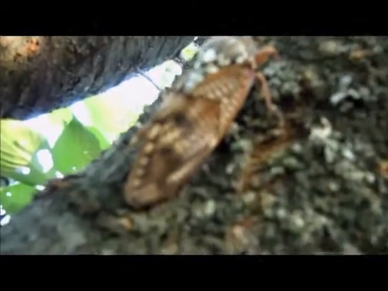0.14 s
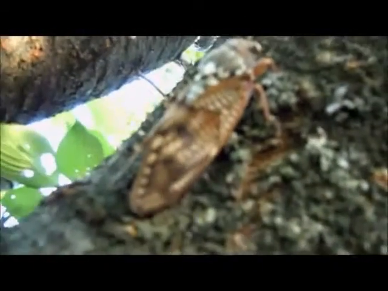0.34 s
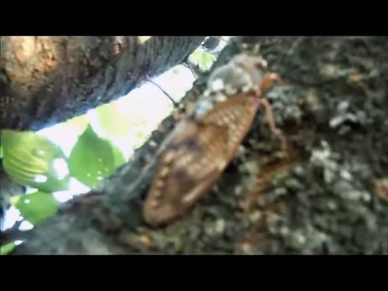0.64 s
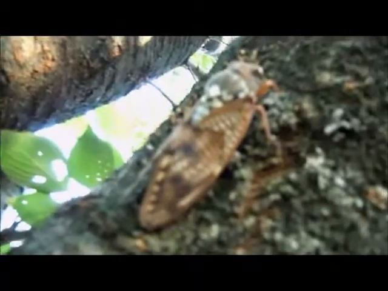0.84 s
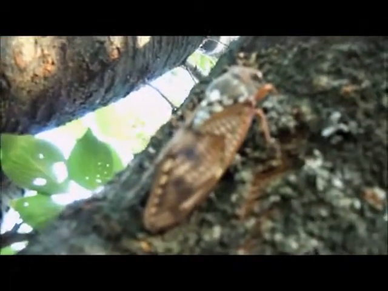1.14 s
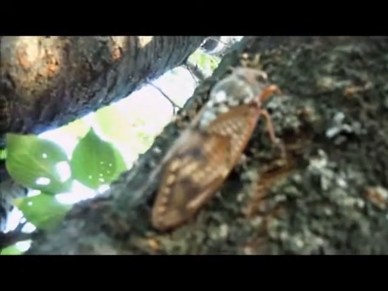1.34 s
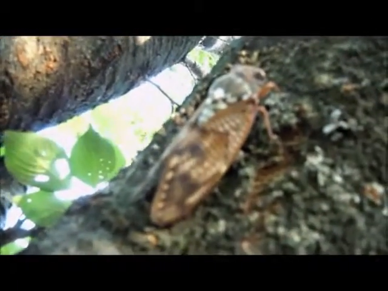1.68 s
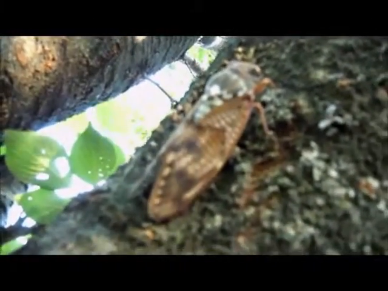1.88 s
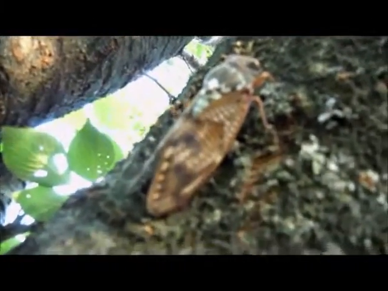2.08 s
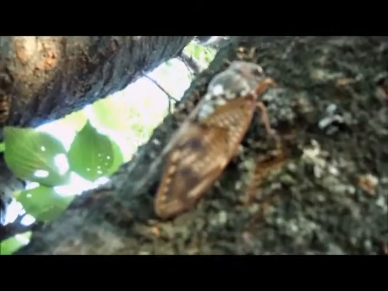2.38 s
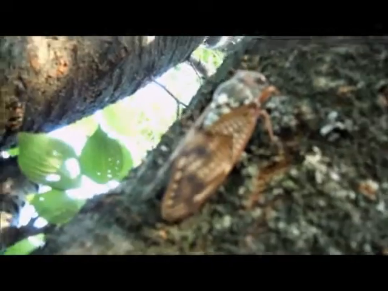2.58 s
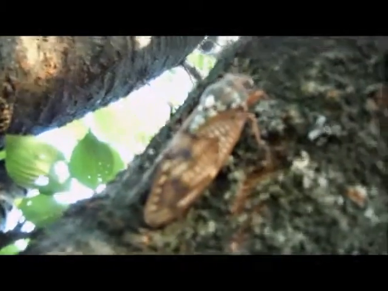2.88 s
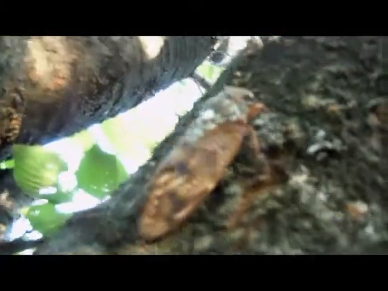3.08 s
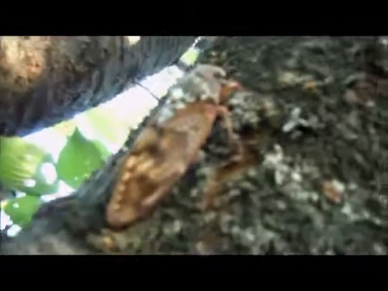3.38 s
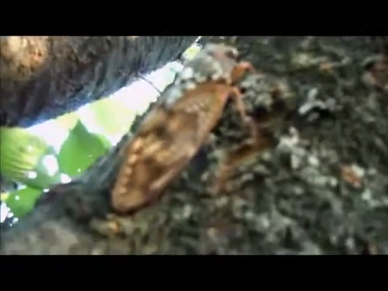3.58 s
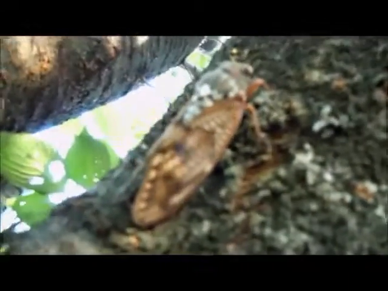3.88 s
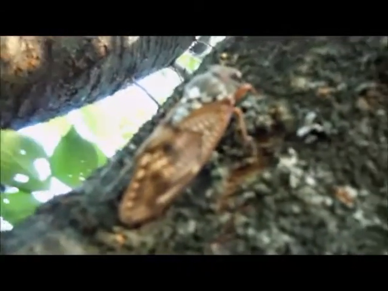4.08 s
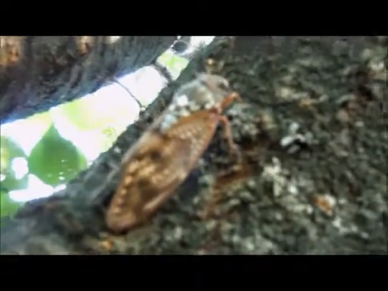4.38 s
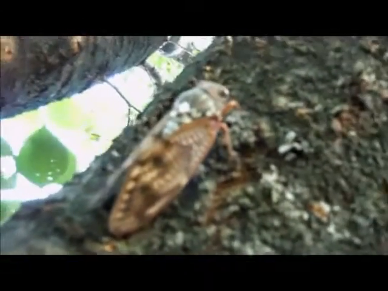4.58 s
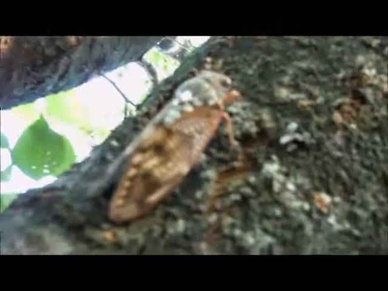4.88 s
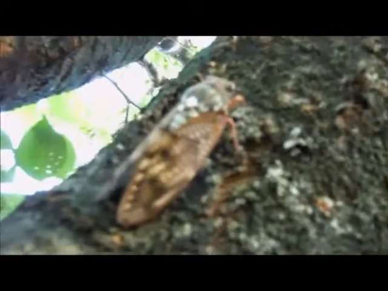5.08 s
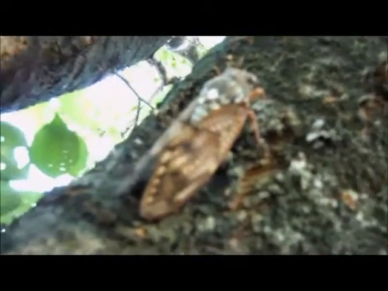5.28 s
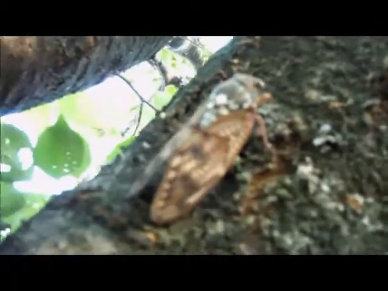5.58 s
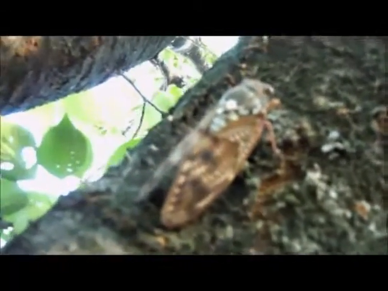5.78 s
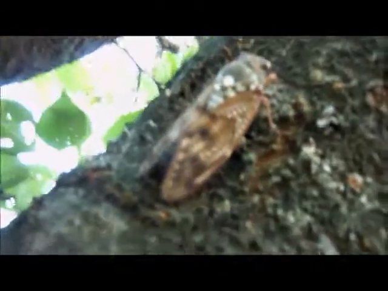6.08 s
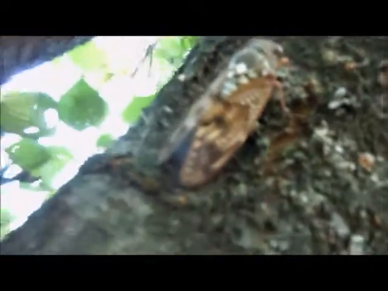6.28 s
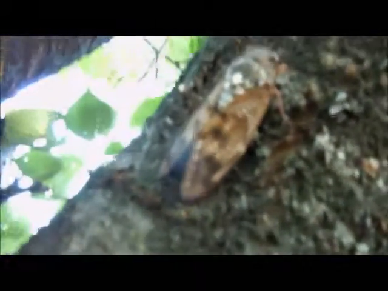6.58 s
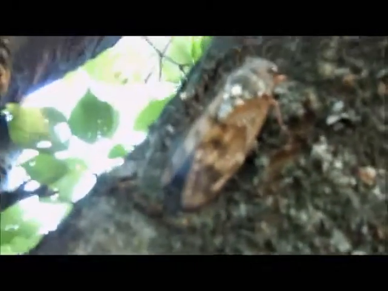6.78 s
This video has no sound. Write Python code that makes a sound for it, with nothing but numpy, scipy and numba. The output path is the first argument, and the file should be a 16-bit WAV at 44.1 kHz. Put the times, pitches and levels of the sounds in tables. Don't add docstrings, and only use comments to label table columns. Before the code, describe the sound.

Loud close cicada song shifts from a rough buzz to a shrill steady whine, with another insect's short rising zips, wind bumps and distant vehicles.

```python
import sys
import numpy as np
from scipy import signal
from scipy.fft import rfft, irfft
from scipy.io import wavfile
from scipy.ndimage import uniform_filter1d
from numba import njit

SR = 44100
rng = np.random.default_rng(int(sys.argv[2]) if len(sys.argv) > 2 else 0)


def level_to_linear(level):
    exponent = np.asarray(level, float) / 20
    return 10 ** exponent


def generate_wav(signal):
    frames = np.transpose(np.atleast_2d(signal))
    scaled = np.clip(frames, -1, 1) * 32767
    pcm = np.round(scaled).astype(np.int16)
    wavfile.write(sys.argv[1], SR, pcm)


N = 306054
T = np.arange(N) / SR

# (time [s], abdomen resonance [Hz], level [dB], ribs per stroke [count], looseness [0-1])
SONG = [(0, 7500, -22, 6.5, 1), (.4, 7240, -23.3, 6, 1), (.92, 6870, -22.3, 6, .8),
        (1.25, 6550, -24, 5.5, .8), (1.45, 6580, -24, 5.5, .85), (1.8, 6100, -23, 5.5, .9),
        (2.08, 6300, -24, 5.5, .85), (2.17, 7560, -23, 6, .85), (2.22, 8420, -18, 6, .2),
        (2.34, 8530, -17.8, 6, 0), (3.42, 8690, -17.6, 6, 0), (3.5, 8640, -18.5, 7, 0),
        (4.05, 8740, -18.2, 6, 0), (4.13, 8760, -20.5, 6, 0), (4.6, 8390, -19.8, 7.4, .45),
        (5.15, 8570, -18.2, 6.4, .6), (5.85, 8490, -19.5, 6.6, .6), (6.94, 8440, -19.5, 7, .5)]
# (time [s], peak level [dB], resonance [Hz])
TICKS = [
    (2.1111, -36, 2230),
    (2.8838, -30, 3330),
    (2.8965, -27.5, 2390),
    (3.953, -29, 2010),
    (3.9654, -56, 1830),
    (4.4433, -38, 2340),
    (6.882, -31, 2850),
]
OPPOSED = np.array([[1], [-1]])


def level(x, db):
    return x * level_to_linear(db) / np.sqrt(np.mean(x ** 2))


def read(table):
    s, *columns = np.transpose(table)
    return [np.interp(T, s, c) for c in columns]


def bump(s, half_s):
    return np.exp(-.5 * ((T - s) / half_s) ** 2)


def bumps(table):
    return sum(db * bump(s, half_s) for s, db, half_s in table)


def colour(x, points):
    hz, db = np.transpose(points)
    bins = np.maximum(np.arange(N // 2 + 1) * SR / N, 1)
    gain = level_to_linear(np.interp(np.log(bins), np.log(hz), db))
    return level(irfft(rfft(x) * gain, N), 0)


@njit
def svf(x, hz, width):
    y, band, low = np.empty(len(x)), 0., 0.
    for i in range(len(x)):
        g, k = np.tan(np.pi * hz[i] / SR), width / hz[i]
        v = (band + g * (x[i] - low)) / (1 + g * (g + k))
        band, low, y[i] = 2 * v - band, low + 2 * g * v, k * v
    return y


def ring(x, hz, width_hz):
    hz = hz * np.ones(N)
    once = svf(x, hz, float(width_hz))
    return svf(once, hz, float(width_hz))


def walk(rate):
    k = int(SR / rate)
    held = np.repeat(rng.standard_normal(400), k)[:N + k]
    return 1.365 * uniform_filter1d(uniform_filter1d(held, k), k)[:N]


def beats(rate):
    phase = np.cumsum(rate * np.ones(N)) / SR
    return np.interp(np.arange(1, int(phase[-1])), phase, T)


def clicks(seconds, size):
    at = np.clip(seconds * SR, 8, N - 9)
    taps = at.astype(int)[:, None] + np.arange(-7, 9)
    lag = taps - at[:, None]
    shape = np.sinc(lag) * np.cos(np.pi * lag / 16) ** 2
    return np.bincount(taps.ravel(), (size[:, None] * shape).ravel(), N)


def spread(x, echo_db, t60, lean=0.):
    t = np.arange(SR // 5) / SR
    tails = rng.standard_normal((5, len(t))) * level_to_linear(-60 * t / t60) * (t > .0003)
    tails = tails / np.sqrt(np.sum(tails ** 2, axis=1, keepdims=True))
    opposed, *common = signal.fftconvolve(x[None], tails, axes=1)[:, :N]
    sway = np.array([walk(4.5) for _ in common])
    common = np.sum(sway * common, axis=0) / np.sqrt(np.sum(sway ** 2, axis=0))
    mid = (x + level_to_linear(echo_db) * common) / np.sqrt(1 + level_to_linear(2 * echo_db))
    return mid + (level_to_linear(-10) * opposed - lean * mid) * OPPOSED


def wide(points, side_db):
    mid, side = (colour(rng.standard_normal(N), points) for _ in range(2))
    return mid + level_to_linear(side_db) * side * OPPOSED


def cicada():
    # (size [dB], lateness [us])
    rib_shape = [(0, 2), (-6, 59), (-5.5, -31), (0.5, 64), (-5, 19), (-6, -48), (0, 37), (4, -10)]
    # (time [s], rate [1/s])
    click_rate = [(0, 520), (.4, 553), (.9, 580), (1.25, 590), (1.45, 510), (2.2, 514), (2.34, 499),
                  (2.6, 488), (2.9, 482), (3.45, 478), (4.25, 473), (4.6, 465), (4.9, 463), (5.15, 469),
                  (5.55, 466), (5.85, 473), (6.94, 471)]
    # (frequency [Hz], width [Hz], level [dB])
    shell = [(6115, 80, 6), (6620, 80, 3), (7085, 70, 7), (7820, 150, 0), (8440, 200, -3), (8960, 160, -5),
             (9350, 200, 0), (10150, 250, 4)]
    # (time [s], change [dB], half length [s])
    sways = [(.68, -3.5, 0.078), (2.267, -1.5, 0.021), (2.52, 1.3, .05), (2.66, 0.3, .05),
             (2.97, -2, 0.061), (3.47, -2, 0.026), (3.662, -1, 0.14), (4.746, -2.2, .05),
             (4.86, 1.6, 0.074), (6.13, 2, .06), (6.38, -1, 0.085), (6.72, -2.5, 0.16), (6.94, 1.5, .08)]
    hz, song_db, ribs, looseness = read(SONG)
    loose_ribs, late_us, scatter_db = 2.1 * looseness ** 1.5, 12 + 30 * looseness, 2
    song_db = song_db + bumps(sways)
    s = beats(read(click_rate)[0] * (1 + 0.000556 * walk(9)))
    i = (s * SR).astype(int)
    chance = rng.standard_normal((5000, 5))[:len(s)].T
    count = np.clip(np.round(ribs[i] + loose_ribs[i] * chance[0]), 1, len(rib_shape)).astype(int)
    rib = np.zeros(len(s), int)
    for k in range(1, len(s)):
        following = rib[k - 1] + 1
        rib[k] = following if following < count[k] else 0
    size_db, lag_us = np.transpose(rib_shape)[:, rib]
    uneven = .58
    size_db, lag_us = size_db * uneven, lag_us * 1.22 * uneven
    near_us = lag_us + late_us[i] * chance[1]
    near = clicks(s + 1e-6 * near_us, level_to_linear(size_db + scatter_db * chance[2]))
    far_us = 1130 - lag_us + late_us[i] * chance[3]
    far = clicks(s + 1e-6 * far_us, level_to_linear(np.roll(size_db, 3) - 8 + scatter_db * chance[4]))
    body = ring(ring(near + far, .93 * hz, 1400), 1.06 * hz, 1400)
    slack = np.clip((8300 - hz) / 900, .08, 1)
    modes = sum(level_to_linear(db) * svf(body, f * np.ones(N), 1. * width) for f, width, db in shell)
    heard = spread(body + slack * modes, echo_db=-1.5, t60=.035, lean=.17)
    loud = np.sqrt(uniform_filter1d(np.mean(heard, axis=0) ** 2, SR // 8) + 1e-18)
    return heard / loud * level_to_linear(song_db - .6 + .5 * walk(14))


def grove():
    # (frequency [Hz], density [dB per Hz])
    chorus = [(2500, -26), (3500, -27), (4100, -15), (4800, -5), (5500, -1), (6300, 0.5), (7200, 0.5),
              (8500, -2), (10300, -7), (11200, -6), (12300, -6.5), (13800, -8), (15000, -7)]
    # (time [s], change [dB], half length [s])
    swells = [(0, 3.5, 0.18), (1.803, 0, 0.16), (2.3, 2, 0.5), (3.85, 1.5, 0.19), (6.147, 1.5, 0.64),
              (6.518, -3.5, 0.14), (6.94, -1.5, 0.074)]
    grain_db = 1.88 * rng.standard_normal(N // 30 + 1).repeat(30)[:N]
    grain = rng.standard_normal(N) * level_to_linear(grain_db)
    sizzle = spread(colour(grain, chorus), echo_db=-10.0, t60=0.1, lean=0.025)
    return sizzle * level_to_linear(-33.5 + bumps(swells) + 9.0 + 0.94 * walk(10))


def traffic():
    # (time when nearest [s], tyre level [dB], rumble level [dB], distance over speed [s])
    cars = [
        (0, -40, -58, 0.067),
        (.7, -39, -48, 0.22),
        (1.55, -47, -42, 0.31),
        (3.98, -42.5, -43.5, 0.13),
        (5.4, -38.5, -40, 0.22),
        (6.15, -49, -41.5, 0.55),
        (6.58, -43, -45, 0.08),
        (6.96, -44, -31, 0.018),
    ]
    # (frequency [Hz], density [dB per Hz])
    rumble_colour = [(20, -3), (60, 2.5), (150, -4), (270, 0), (400, -5), (560, -5), (700, -11),
                     (1000, -22)]
    # (frequency [Hz], density [dB per Hz])
    tyre_colour = [(300, -2), (600, -8.5), (800, 1.5), (1100, 0.5), (1500, -2), (2000, -11), (3000, -9.5),
                   (4500, -15.5)]
    near = np.array([1 / (1 + ((T - s) / span) ** 2) for s, _, _, span in cars])
    _, tyre_db, rumble_db, _ = np.transpose(cars)
    hiss = np.sqrt(level_to_linear(2 * -57.5) + level_to_linear(2 * tyre_db) @ near)
    roll = np.sqrt(level_to_linear(2 * -45.5) + level_to_linear(2 * rumble_db) @ near)
    rumble = wide(rumble_colour, side_db=-11) * roll * level_to_linear(1.5 + 1.8 * walk(6) - .9 * OPPOSED)
    tyres = wide(tyre_colour, side_db=-11) * hiss * level_to_linear(1.5 + 1.3 * walk(5))
    return rumble + tyres


def wind():
    # (time [s], level [dB], half length [s])
    gusts = [(.05, -47, 0.085), (0.36, -45.5, 0.059), (0.598, -38.5, 0.066), (2.837, -51.5, 0.089),
             (3.22, -48, 0.046), (3.7, -53.5, 0.12), (5.28, -50, .05), (6.07, -45.5, .07),
             (6.32, -40.5, 0.058), (6.56, -35.5, 0.064), (6.752, -41.5, 0.12), (6.92, -32, 0.06)]
    breeze_power = level_to_linear(2 * -60.5)
    force = np.sqrt(breeze_power + sum((level_to_linear(db) * bump(s, half_s)) ** 2 for s, db, half_s in gusts))
    air = wide([(10, -6), (25, 0), (50, -3), (110, -9), (250, -26), (600, -50)], side_db=-1.5)
    return air * force * level_to_linear(3.5 + 2.5 * walk(12))


def neighbour():
    # (time of the end [s], level [dB], length [s])
    zips = [(0.119, -21, 0.052), (0.63, -23, 0.077), (0.697, -30, 0.041), (1.082, -22.5, 0.071),
            (1.448, -26.5, 0.048), (1.564, -21, 0.059), (2.055, -21.5, 0.055), (2.578, -22, 0.071),
            (2.803, -27, 0.066), (3.081, -23, 0.076), (3.564, -23.5, 0.071), (4.092, -25, 0.076),
            (4.64, -26.5, 0.052), (4.84, -32, .05), (5.186, -23, 0.062), (5.741, -20.5, 0.066),
            (6.15, -29.5, 0.056), (6.313, -21, 0.058), (6.86, -24, 0.11)]
    zip_clicks_db = (0, -1, -8)
    s = beats(498. * (1 + .01 * walk(12)))
    chance = rng.standard_normal((5000, 2))[:len(s)].T
    size_db = np.array(zip_clicks_db)[np.arange(len(s)) % 3] + 0.93 * chance[0]
    train = clicks(s + 40e-6 * chance[1], level_to_linear(size_db))
    swell, upper, climb = np.zeros(N), np.zeros(N), np.zeros(N)
    for end, db, length in zips:
        u = np.clip(1 + (T - end) / length, 0, 1) * (T < end + .004)
        stop = np.clip(1 - (T - end) / 0.00081, 0, 1)
        shape = level_to_linear(db) * np.minimum(u / 0.94, 1) ** 0.72 * stop
        swell = swell + shape
        upper = upper + shape * level_to_linear(-1.5) * u ** 0.06
        climb = climb + u
    low = level(ring(ring(train, 5860, 4800), 4700 + 1850 * climb, 1900), 0)
    high = level(ring(train, 10300 + 2300 * climb, 9400), 0)
    return spread(swell * low + upper * high, echo_db=-6, t60=0.05, lean=0.051)


def grip():
    out = 0
    for s, db, hz in TICKS:
        rattle = rng.standard_normal(N) * level_to_linear(-60 * np.abs(T - s - .001) / 0.084)
        centre_hz = .6 * hz + 1150
        tick = ring(ring(rattle, centre_hz, 2600), centre_hz, 2600)
        out = out + level_to_linear(db) * tick / np.abs(tick).max()
    return spread(out, echo_db=-6, t60=0.02)


def lorry():
    # (time [s], firing rate [Hz], level [dB], second order level [dB])
    engine = [
        (4.5, 52.15, -48, -66),
        (4.8, 53.1, -50, -49),
        (5.12, 53.1, -33.5, -44),
        (5.45, 54.9, -35.5, -38.5),
        (5.62, 55.1, -34, -40.5),
        (5.94, 52.9, -39, -41.5),
        (6.3, 52.44, -45, -42),
        (6.55, 52.3, -52, -43),
    ]
    # (multiple of the firing rate, level re second order [dB])
    orders = [(3, -7), (4, -15), (5, -12.5)]
    hz, first_db, second_db = read(engine)
    turn = 2 * np.pi * np.cumsum(hz) / SR
    drone = level_to_linear(first_db) * np.sin(turn) + level_to_linear(second_db + 1.9 * walk(6.1)) * np.sin(2 * turn)
    drone = drone + sum(level_to_linear(second_db + db + 1.15 * walk(5.1)) * np.sin(k * turn) for k, db in orders)
    start, end = engine[0][0], engine[-1][0]
    passing = np.interp(T, [start - .1, start + .1, end, end + 0.15], [0, 1, 1, 0])
    return np.sqrt(2) * drone * passing


def scene():
    return cicada() + grove() + traffic() + wind() + neighbour() + grip() + lorry()


def narrow(side, hz, s):
    # (start [s], end [s])
    wide_moments = [(.098, .17), (.553, .649), (.707, .79), (.81, .873), (.932, 1.132), (1.213, 1.38),
                    (1.628, 1.71), (1.952, 2.088), (2.653, 2.72), (2.925, 2.98), (3.159, 3.24),
                    (3.435, 3.5), (4.596, 4.8), (4.84, 4.91), (5.757, 5.89), (6.775, 6.855)]
    # (frequency [Hz], gain [dB])
    ports = [(30, 0), (150, 2), (400, -.5), (1500, 0), (4500, 1), (6000, -.5), (7500, 2), (9500, 3.5),
             (11000, 5.5), (14000, 5.5)]
    keep = hz[:, None] < 420 * level_to_linear(3.5 * rng.standard_normal(len(s)))
    for start, end in wide_moments:
        some = rng.random(len(hz) // 6 + 1).repeat(6)[:len(hz)] < .5
        keep = keep | np.outer((hz > 4300) | (hz < 1300) | some, (s > start) & (s < end))
    for at, _, tick_hz in TICKS:
        keep = keep | np.outer(np.abs(hz - tick_hz) < 450, np.abs(s - at) < .03)
    song_hz = np.interp(s, *np.transpose(SONG)[:2])
    patch = rng.random((len(hz) // 10 + 1, len(s) // 9 + 1)).repeat(10, axis=0).repeat(9, axis=1)
    in_song = (np.abs(hz[:, None] - song_hz) < 650) & (s > 2.2)
    keep = keep | (patch[:len(hz), :len(s)] < .26) & in_song
    whine = ((hz > 7500) & (hz < 9600))[:, None] * (s > 2.3)
    odds = .004 + .03 * (hz < 4300)[:, None] + .14 * whine
    stray = rng.random((len(hz) // 10 + 1, len(s) // 2 + 1)).repeat(10, axis=0).repeat(2, axis=1)
    side = side * np.where(keep, 1, level_to_linear(-9))
    keep = keep | (stray[:len(hz), :len(s)] < odds)
    port_hz, port_db = np.transpose(ports)
    return side * keep * level_to_linear(np.interp(np.log(hz + 1), np.log(port_hz), port_db))[:, None]


def faint_patches(mid, hz):
    # (lower edge [Hz], upper edge [Hz], threshold re surroundings [dB])
    from_hz, to_hz, under_db = (1400, 4200, -1.0)
    power = uniform_filter1d(uniform_filter1d(np.abs(mid) ** 2, size=4, axis=0), size=5, axis=1)
    around = np.exp(uniform_filter1d(np.log(power + 1e-18), size=21, axis=0))
    return (power < around * level_to_linear(2 * under_db)) & ((hz > from_hz) & (hz < to_hz))[:, None]


def top_edge(s):
    # (time [s], depth [Hz])
    sags = [
        (1.42, 430),
        (3.27, 500),
        (3.72, 500),
        (4.93, 380),
        (6.13, 680),
    ]
    fall_s, back_s = .07, .16
    sag_hz = sum(np.interp(s - at, [-fall_s, 0, back_s], [0, depth, 0]) for at, depth in sags)
    return 14320 - 70 - sag_hz


def roll_off(x):
    return signal.sosfilt(signal.butter(12, 15430, fs=SR, output="sos"), x)


def record(dry):
    mid_side = np.array([dry[0] + dry[1], dry[0] - dry[1]]) / 2
    hz, s, (mid, side) = signal.stft(mid_side, SR, nperseg=2048)
    side = narrow(side, hz, s)
    faint = faint_patches(mid, hz)
    mid, side = mid * ~faint, side * ~faint
    passed = hz[:, None] < top_edge(s)
    pair = signal.istft(np.array([mid + side, mid - side]) * passed, SR, nperseg=2048)[1][:, :N]
    return roll_off(pair)


dry = scene()
out = record(dry)
generate_wav(out)
```